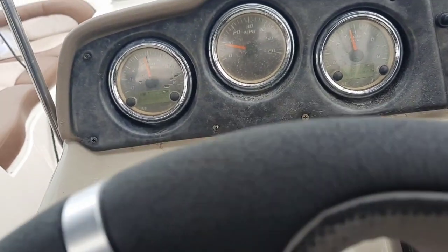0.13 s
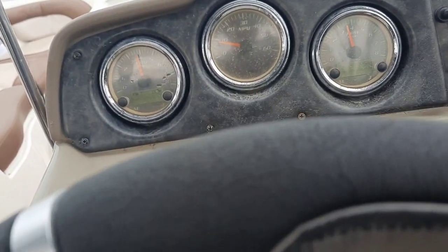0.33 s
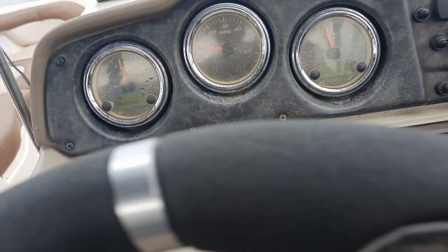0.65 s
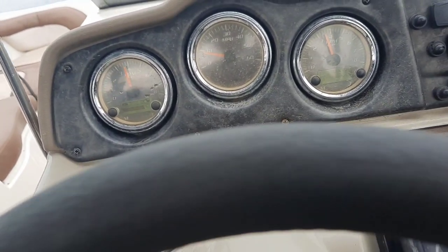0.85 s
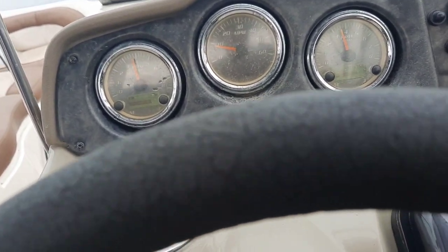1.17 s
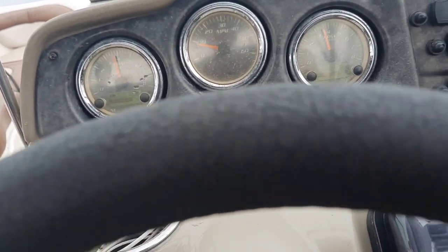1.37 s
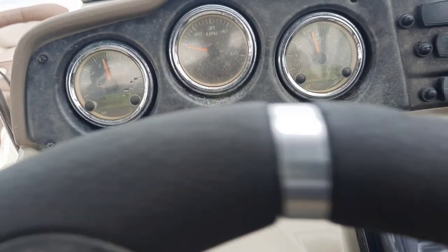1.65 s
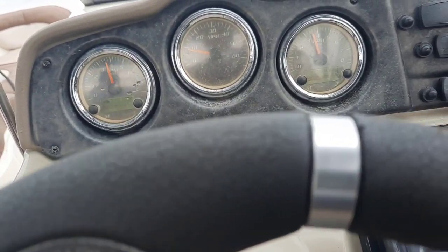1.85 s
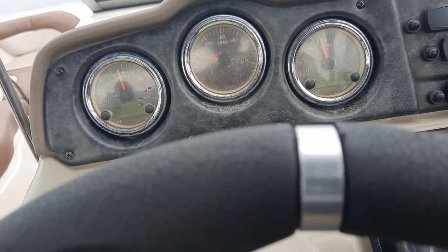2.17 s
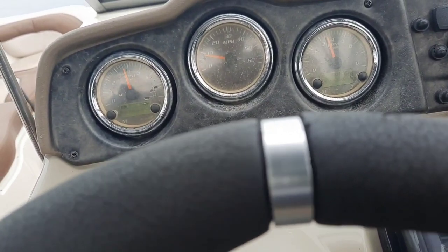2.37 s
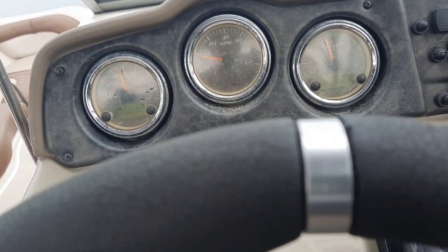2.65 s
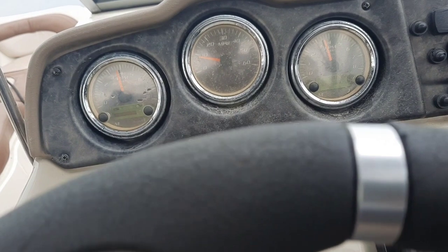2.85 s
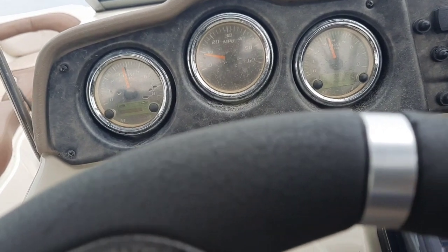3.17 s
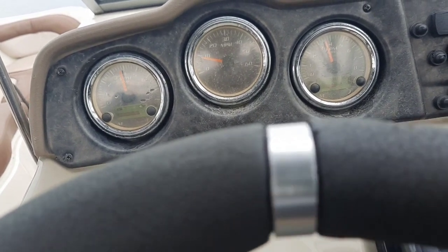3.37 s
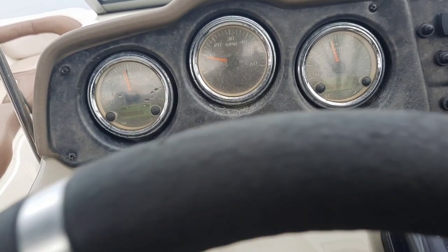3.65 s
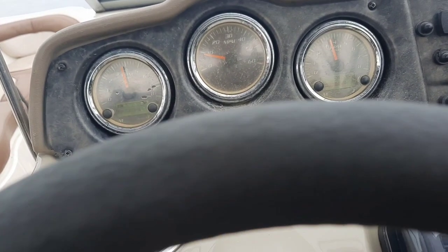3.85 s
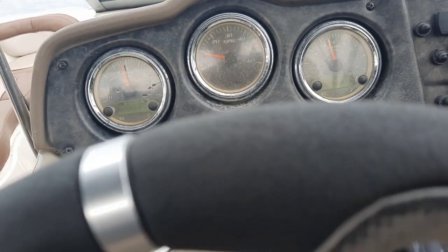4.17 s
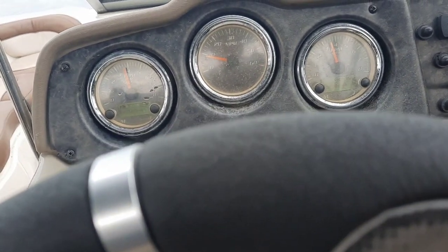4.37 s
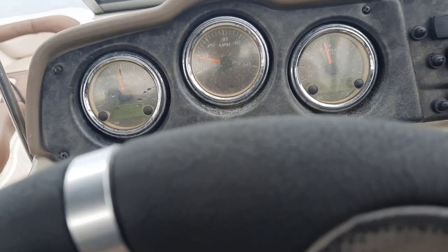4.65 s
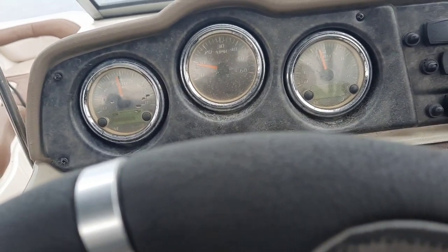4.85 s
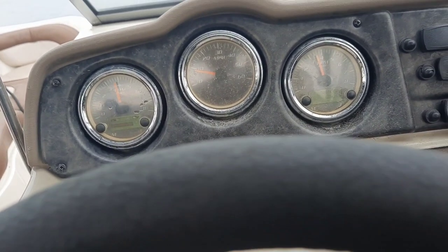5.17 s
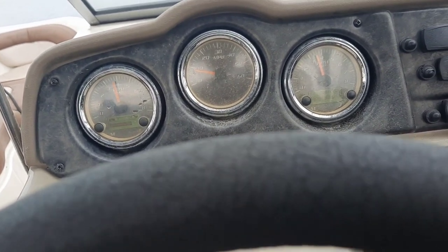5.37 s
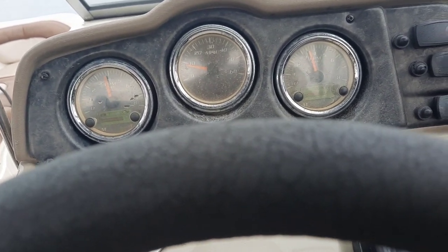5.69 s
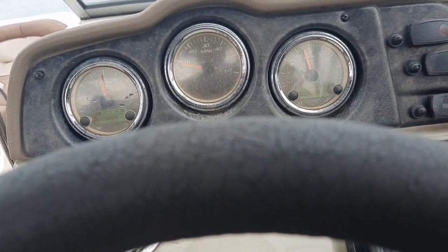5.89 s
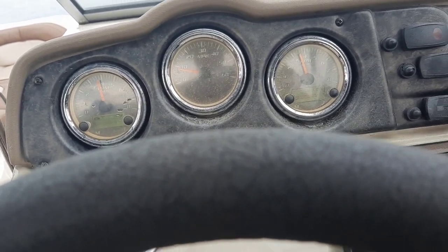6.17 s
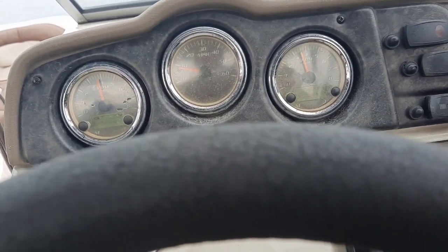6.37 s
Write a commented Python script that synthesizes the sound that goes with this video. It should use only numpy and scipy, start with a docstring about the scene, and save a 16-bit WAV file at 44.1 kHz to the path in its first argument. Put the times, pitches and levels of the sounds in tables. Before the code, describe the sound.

From 0 to about 6.6 seconds, a jet boat runs at steady throttle, heard in stereo from the helm. Two engines drone loudly and low, one slightly faster than the other, so their deep notes beat in a regular throb of roughly seven pulses per second. The upper hum of the drone thins a little around 0.35 seconds, then returns. A dense, quick mechanical clatter buzzes and rings through the cockpit panels, slightly brighter on the right. A thin gear whine builds gently until about 2.7 seconds and then holds. A wavering mid-pitched howl swells briefly near 0.1 and 0.7, faintly at 2.6, longer around 3.2, then at 4.3, 4.8 and 5.1, and most strongly near 5.9 seconds. Water drums softly under the hull while wide, diffuse spray hisses throughout. The engines never change speed or stop.

```python
"""A deep, regular throb rolls under the drone of a twin-engine jet boat at steady throttle, heard from the helm.
Two four-cylinder engines run at slightly different speeds: summed harmonics of their cycle rates beat together.
Noise patterns repeated once per engine cycle make the clatter; a wavering sine makes a howl that swells and fades.
Shaped noise, common to both sides for the hull and nearly unrelated for the spray, makes the rumble and the hiss."""
import sys
import numpy as np
from scipy import signal
from scipy.fft import rfft, irfft, next_fast_len
from scipy.io import wavfile

SR = 44100
rng = np.random.default_rng(int(sys.argv[2]) if len(sys.argv) > 2 else 0)


def wrap_up_sound(samples):
    """Save the sound to the file named by the first command line argument, as 16-bit audio."""
    columns = np.atleast_2d(samples).T
    # keep every value between -1 and 1, then stretch to whole-number steps
    tamed = np.clip(columns, -1, 1)
    steps = np.round(tamed * 32767).astype(np.int16)
    wavfile.write(sys.argv[1], SR, steps)


N = 287908
TIME = np.arange(N) / SR

# nominal firing rates of the two engines (Hz); their difference is the beat rate of the throb
FAST_HZ, SLOW_HZ = 124.495, 117.074
# a moment when both nominally fire together, the crest of one throb (s)
IN_STEP_S = 0.032
# hunting of each engine: approximate spread of its firing rate (Hz), random turns per second
HUNT_HZ, HUNT_RATE = 0.179, 2.5


def undb(db):
    """Amplitude ratio: 20 dB is a factor of ten in gain."""
    return 10 ** (np.asarray(db) / 20)


def walk(rate):
    """Band-limited random wander: `rate` random knots a second, smoothly joined, with a spread of about 1."""
    oversampling = 8
    knots = rng.standard_normal(2048)
    fine = signal.resample_poly(knots, oversampling, 1)
    # start eight knots in, clear of the filter's edge
    place = TIME * rate * oversampling + 64
    return np.interp(place, np.arange(len(fine)), fine)


def swell(peak_s, length_s):
    """Raised-cosine envelope: a smooth rise to 1 and fall back to 0."""
    position = np.clip((TIME - peak_s) / length_s, -0.5, 0.5)
    return np.cos(np.pi * position) ** 2


def colour(x, spectrum):
    """Spectral shaping: white sound of rms 1 takes on a left and a right power density in dB per Hz."""
    hz, *ears = np.transpose(spectrum)
    size = next_fast_len(N)
    log_hz = np.log(np.maximum(np.fft.rfftfreq(size, 1 / SR), 1))
    density_db = [np.interp(log_hz, np.log(hz), db) for db in ears]
    # white sound of rms 1 spreads its power over SR / 2
    gain = undb(density_db) * np.sqrt(SR / 2)
    return irfft(rfft(x, size) * gain, size)[:, :N]


def crank(firing_hz):
    """Phase is integrated speed: count of four-stroke cycles, four firings each, with a little hunting."""
    lead = HUNT_HZ / HUNT_RATE * walk(HUNT_RATE) / 2
    firings = firing_hz * (TIME - IN_STEP_S) + lead
    return firings / 4


def drone(cycles, swells_db, whine_db, orders, firing_rough, rough, wander_rate, spread_hz):
    """Periodic combustion gives harmonics of the cycle rate; uneven combustion blurs all but the firmest."""
    out = np.zeros((2, N))
    cycle_hz = (cycles[-1] - cycles[0]) / TIME[-1]
    for order, left_db, right_db in orders:
        order = round(order)
        start, side = rng.uniform(0, 2 * np.pi), rng.choice([-1, 1])
        # order 4 is the firing note, tied to the crank so that the two engines beat
        angle = 2 * np.pi * order * cycles
        if order != 4:
            angle = angle + start
        depth = firing_rough if order in (2, 4, 8) else rough
        # complex wander shakes both level and phase, keeping the mean power
        wander = walk(wander_rate) + 1j * walk(wander_rate)
        swing = (1 + depth * wander) / np.sqrt(1 + 2 * depth ** 2)
        swell_db = swells_db.get(order, whine_db if order > 20 else 0)
        tone = np.sqrt(2) * swing * np.exp(1j * angle) * undb(swell_db)
        # short waves bounce round the cockpit and reach the two sides out of step (radians)
        lag = side * min((order * cycle_hz / spread_hz) ** 2, 2)
        out[0] += undb(left_db) * tone.real
        out[1] += undb(right_db) * (tone * np.exp(1j * lag)).real
    return out


def howl(cycles, pan_db, waver):
    """Resonance: a pipe sings on the engine's fourth firing harmonic, swelling over a quiet steady level."""
    # swells added to the steady amplitude; columns: peak_s, length_s, level_db (rms at the peak, before panning)
    howl_swells = [(0.108, 0.21, -31), (.71, 0.21, -32), (2.59, 0.28, -36), (3.174, 0.89, -31),
                   (4.305, 0.36, -33.5), (4.794, 0.22, -33), (5.1, .3, -29.5), (5.872, 0.58, -28.5),
                   (6.2, 0.96, -34)]
    strength = undb(-44.5)  # steady level
    for peak_s, length_s, level_db in howl_swells:
        strength = strength + undb(level_db) * swell(peak_s, length_s)
    # order 16 of the cycle, with its phase wavering by about `waver` radians
    angle = 2 * np.pi * 16 * cycles + waver * walk(6.2)
    pan = undb(np.array([[pan_db], [-pan_db]]) / 2)
    return np.sqrt(2) * strength * np.sin(angle) * pan


def rattle(cycles, change, change_rate, size=1400, count=3):
    """Cyclic excitation: one dense pattern of ticks returns every cycle while others fade in and out."""
    place = (cycles % 1) * size
    rows = rng.standard_normal((count + 1, size))
    patterns = [np.interp(place, np.arange(size), row) for row in rows]
    shifting = sum(walk(change_rate) * pattern for pattern in patterns[1:]) / np.sqrt(count)
    return (patterns[0] + change * shifting) / np.sqrt(1 + change ** 2)


def panels(x):
    """Modal resonance: each panel adds its own narrow ring to the sound that passes through it."""
    # resonances of the hatch and cockpit panels; columns: centre_hz, width_hz, lift_db
    panel_modes = [(1647, 44, 5.5), (2115, 13, 3), (2240, 23, 5), (2445, 22, 10), (2605, 23, 5),
                   (2886, 15, 5), (3040, 14, 7.5), (3375, 26, 5.5)]
    out = x
    for hz, width_hz, lift_db in panel_modes:
        b, a = signal.iirpeak(hz, hz / width_hz, fs=SR)
        out = out + (undb(lift_db) - 1) * signal.lfilter(b, a, x)
    return out


def clatter(engines):
    """Repeated impacts of valve gear and pump blades ring the panels; each side has its own patterns."""
    # spectrum of the clatter through the hatch, for white input and before the panels' lift
    # columns: frequency_hz, left_db_per_hz, right_db_per_hz
    clatter_spectrum = [(150, -87, -71), (504, -68.5, -68), (1020, -65.5, -66), (1520, -67.5, -64.5),
                        (1580, -64.5, -56.5), (1620, -67, -60.5), (2140, -59, -56.5), (2480, -64.5, -58),
                        (2795, -59.5, -56), (3140, -75, -69), (3580, -68.5, -64.5), (4200, -72.5, -69.5),
                        (7000, -112, -102)]
    ears = [sum(rattle(cycles, change=0.65, change_rate=13) for cycles in engines) for _ in range(2)]
    ticks = np.array(ears) / np.sqrt(2)
    return colour(panels(ticks), clatter_spectrum)


def hull():
    """Turbulent forcing: water drums on the hull as one noise, coherent between the two sides."""
    # spectrum of water pounding the hull, before its small level wander
    # columns: frequency_hz, left_db_per_hz, right_db_per_hz
    hull_spectrum = [(20, -76, -73), (42, -69, -69), (70, -62, -52), (100, -63, -52.5), (124, -49, -50.5),
                     (142, -68, -55), (182, -54.5, -51), (215, -70, -68), (244, -56.5, -54.5),
                     (310, -61, -55), (387, -71.5, -60.5), (494, -58, -59.5), (720, -72.5, -66),
                     (1690, -110, -93)]
    drumming = rng.standard_normal(N) * undb(0.5 * walk(4.9))
    return colour(drumming, hull_spectrum)


def spray(shared, flutter_db):
    """Diffuse sound: many small splashes hiss as noise with only a `shared` part of its power common."""
    # spectrum of spray and jet wash as coloured by the microphones, before its small flutter
    # columns: frequency_hz, left_db_per_hz, right_db_per_hz
    spray_spectrum = [(200, -66, -69), (600, -68, -65), (1200, -65.5, -63.5), (1830, -66, -61.5),
                      (2560, -61.5, -59), (3150, -67.5, -65.5), (4210, -72, -67), (5390, -70.5, -60),
                      (6620, -71, -59), (7620, -68.5, -68), (9380, -95.5, -91.5), (9040, -85, -105),
                      (12100, -77, -77), (15000, -80.5, -78)]
    separate = np.sqrt(1 - shared) * rng.standard_normal((2, N))
    common = np.sqrt(shared) * rng.standard_normal(N)
    return colour((separate + common) * undb(flutter_db * walk(30)), spray_spectrum)


def scene():
    """Superposition: the pressures of both engines, their clatter, the howl and the water add."""
    # tones of each engine; cycle_order is rounded to a whole multiple of the four-stroke cycle rate
    # columns: cycle_order, left_db, right_db (rms, before swells)
    fast_orders = [(2, -35, -41.5), (3, -41, -35), (4, -17, -16), (5, -40.5, -32.5), (6, -38.5, -41),
                   (8, -30, -28.5), (9, -43, -49), (10, -41, -42.5), (12, -44, -63), (14, -37.5, -49.5),
                   (15, -40, -39.5), (16, -38, -38), (17, -55, -51), (18, -47, -47), (20, -46.5, -46.5),
                   (23, -67, -50.5), (26, -55.5, -46), (31, -49, -53.5), (32, -47, -43.5), (40, -45.5, -36),
                   (43, -51, -42.5), (46, -73, -54), (53, -52, -41.5), (54, -49, -45), (66, -47, -42.5),
                   (66.6, -66, -48), (77.9, -62, -37.5)]
    slow_orders = [(2, -27, -25.5), (3, -49, -45), (4, -22, -20), (6, -43, -44.5), (8, -40.5, -38),
                   (9, -58, -54), (10, -34.5, -42.5), (11, -45, -53), (12, -43, -82), (17, -53, -49),
                   (18, -59, -54), (38, -66, -53), (57, -50, -43.5), (82.7, -46.5, -46)]
    fast, slow = crank(FAST_HZ), crank(SLOW_HZ)
    # each firing note wavers by about 0.3 dB
    fast_db, slow_db = 0.3 * walk(HUNT_RATE), 0.3 * walk(HUNT_RATE)
    # the fast engine's second firing harmonic dips once, by 8 dB
    octave_db = -8 * swell(peak_s=0.35, length_s=0.79)
    # the gear whine, orders above 20, builds up over 2.7 s and then holds
    whine_db = np.interp(TIME, [0, 2.7], [-3.5, 1.5])
    fast_swells, slow_swells = {4: fast_db, 8: octave_db}, {4: slow_db}
    engines = drone(fast, fast_swells, whine_db, fast_orders,
                    firing_rough=0.041, rough=0.26, wander_rate=8, spread_hz=910)
    engines += drone(slow, slow_swells, whine_db, slow_orders,
                     firing_rough=0.033, rough=0.25, wander_rate=8, spread_hz=1230)
    water = hull() + spray(shared=0.031, flutter_db=0.41)
    return engines + howl(slow, pan_db=-1.0, waver=0.4) + clatter([fast, slow]) + water


def record(dry):
    """Band limiting: a steep elliptic low-pass removes the treble above 15.5 kHz."""
    low_pass = signal.ellip(10, 0.1, 80, 15500, fs=SR, output="sos")
    return signal.sosfilt(low_pass, dry)


dry = scene()
out = record(dry)
wrap_up_sound(out)
```